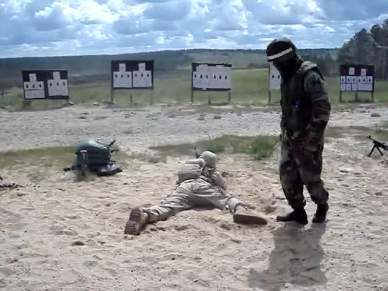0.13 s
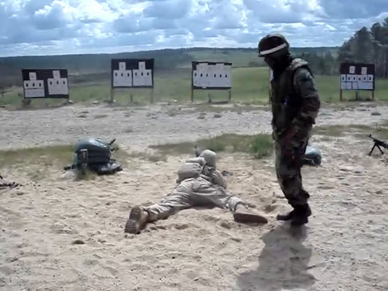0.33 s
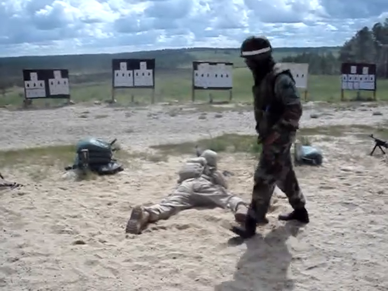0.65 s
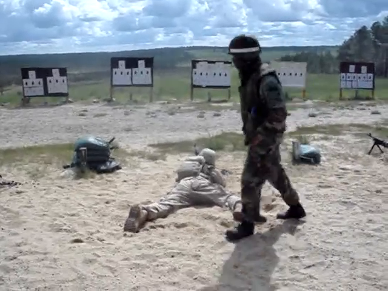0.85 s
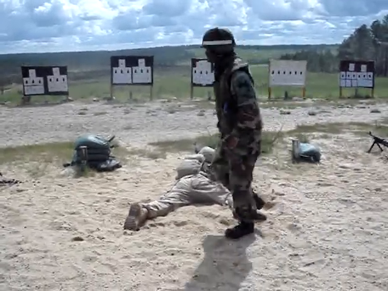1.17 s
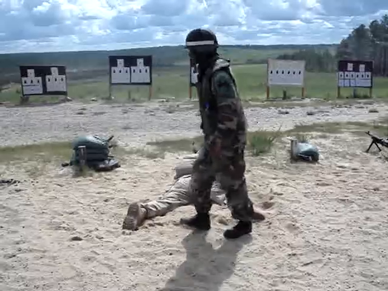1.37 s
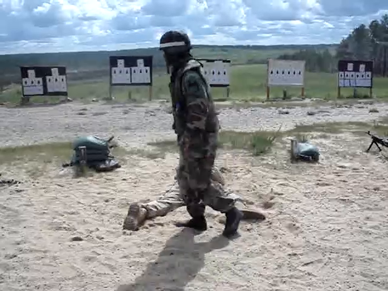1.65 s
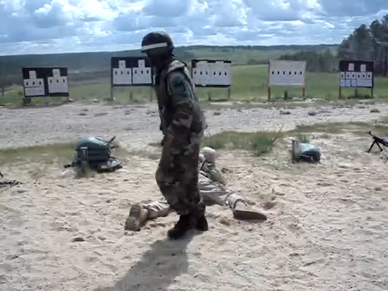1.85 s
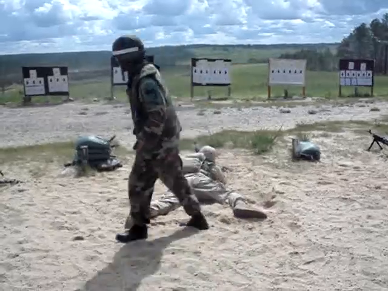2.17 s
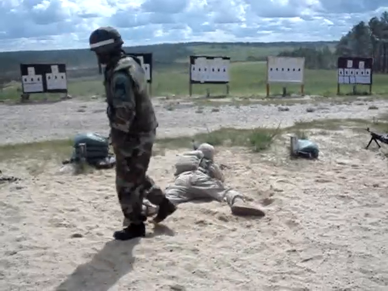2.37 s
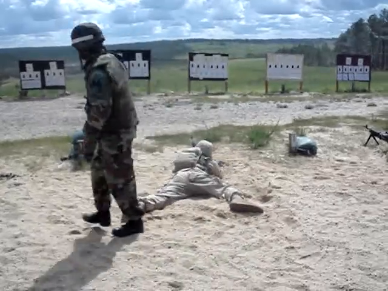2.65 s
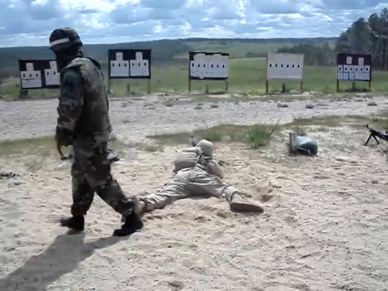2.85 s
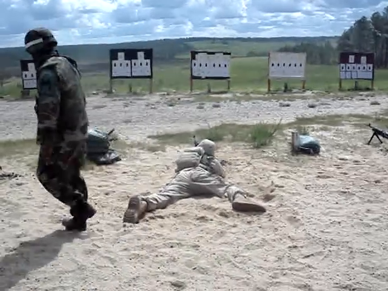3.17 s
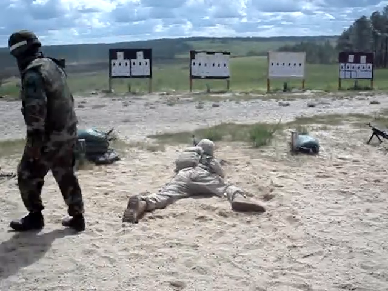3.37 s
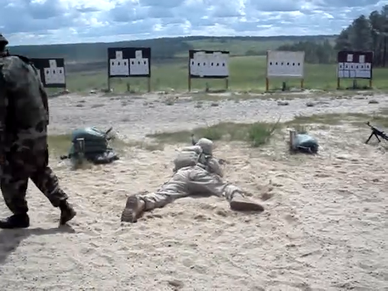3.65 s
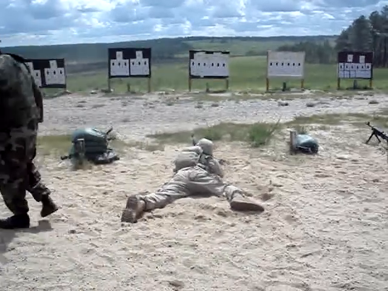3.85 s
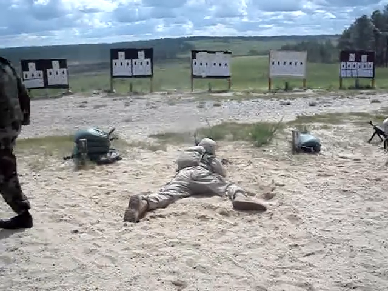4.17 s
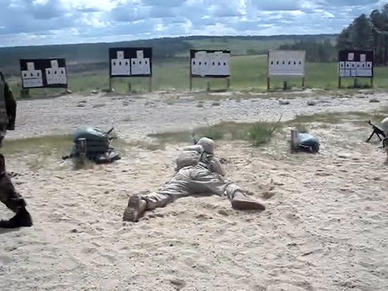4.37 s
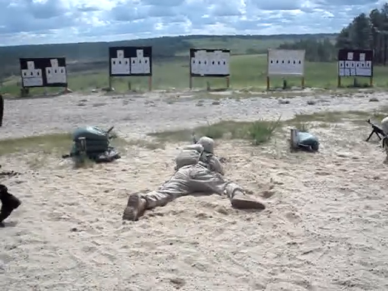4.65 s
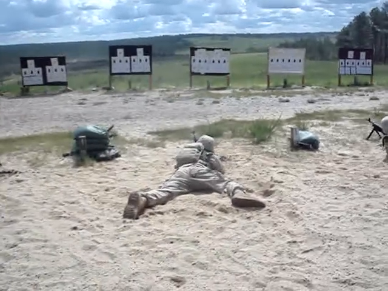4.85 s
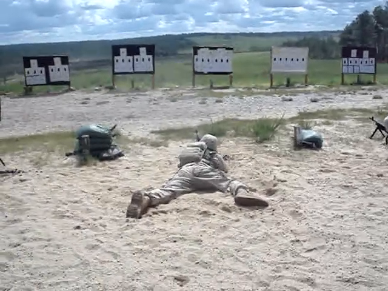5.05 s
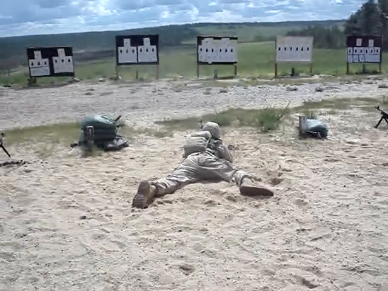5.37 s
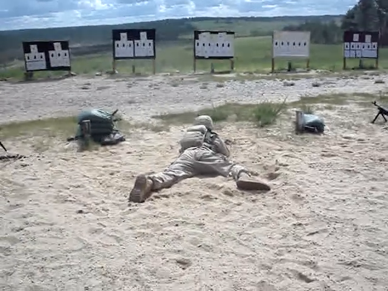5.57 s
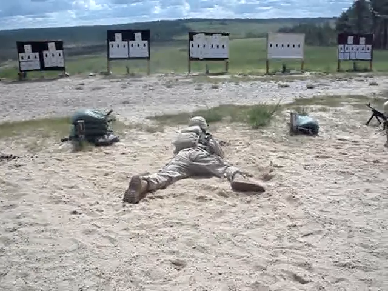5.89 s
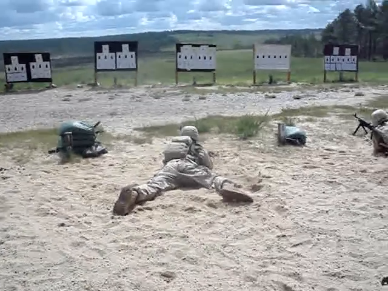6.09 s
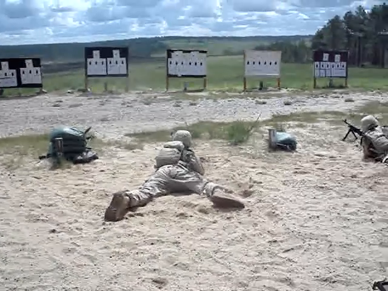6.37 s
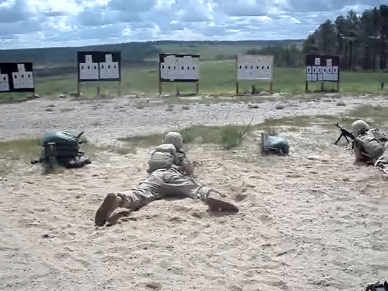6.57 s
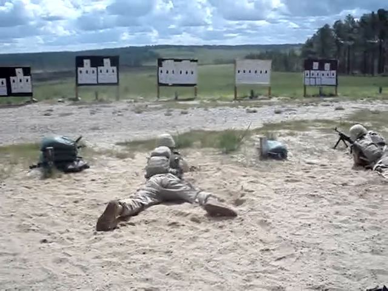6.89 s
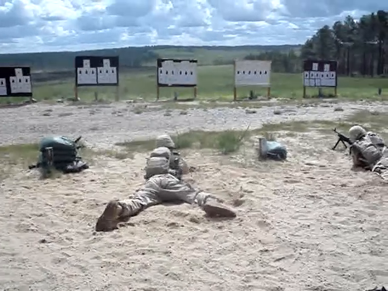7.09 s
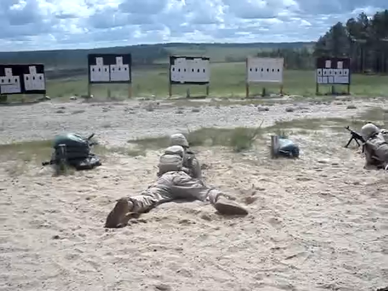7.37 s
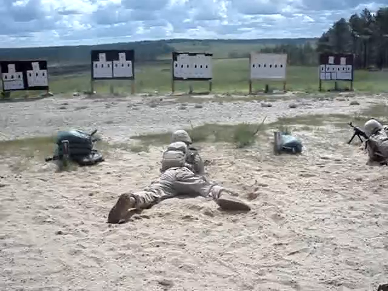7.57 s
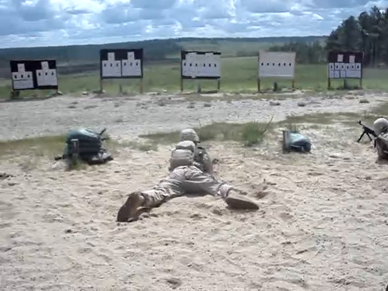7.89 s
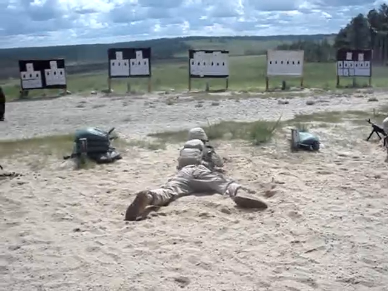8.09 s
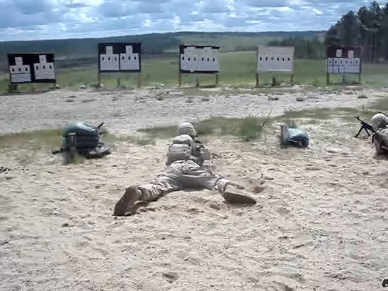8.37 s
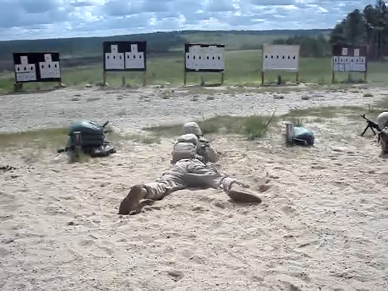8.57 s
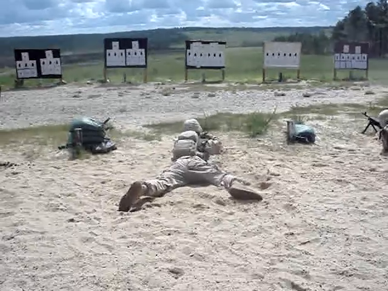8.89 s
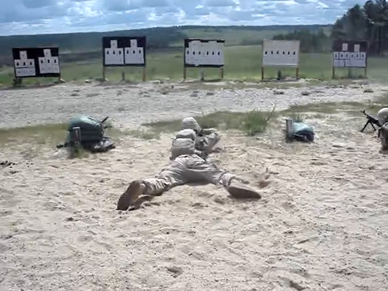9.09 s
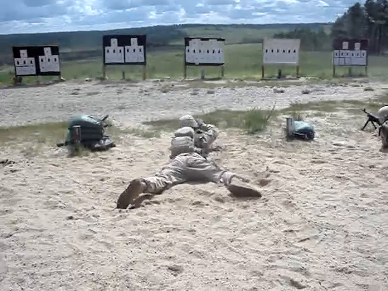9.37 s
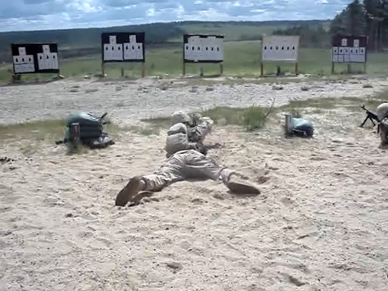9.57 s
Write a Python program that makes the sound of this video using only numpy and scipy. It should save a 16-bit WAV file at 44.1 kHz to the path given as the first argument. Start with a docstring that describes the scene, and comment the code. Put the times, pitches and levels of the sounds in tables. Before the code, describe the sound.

Several automatic weapons fire short rapid bursts outdoors, loud and overloaded, stopping twice for fading echoes and small steel clinks before resuming.

```python
"""Automatic weapons on an outdoor firing line, heard from just behind the gunners as a small camera picks them up.
Bursts overlap until 4.8 s, answered by woods already rolling at the start; after a pause, steel clinks and firing
resumes from 6.1 to 8.1 s. After a second pause and clink, one gun closes the scene from 9.2 s.
Each round is a pulse radiated as a muzzle blast, scattered by the ground and reflected by rows of target boards.
Overload flattens the blasts, and automatic gain lowers the level at each peak and raises it in the pauses."""
import sys
import numpy as np
from scipy import signal
from scipy.fft import rfft, irfft, next_fast_len
from scipy.io import wavfile
from scipy.ndimage import uniform_filter1d, map_coordinates

SR = 44100
rng = np.random.default_rng(int(sys.argv[2]) if len(sys.argv) > 2 else 0)


def unload_wav(signal):
    """Save mono or channel-first audio to the path in sys.argv[1] as 16-bit WAV at rate SR, clipped to [-1, 1]."""
    wavfile.write(
        sys.argv[1],
        SR,
        np.round(np.clip(np.atleast_2d(signal).T, -1, 1) * 32767).astype(np.int16),
    )


N = 429527


def amp(db):
    """Level to amplitude: 20 dB is a factor of ten."""
    return 10 ** (np.asarray(db) / 20)


def unit(x):
    """Normalization: scale x to an rms of 1."""
    return x / np.sqrt(np.mean(x ** 2) + 1e-20)


def along(points, hz):
    """Log-frequency interpolation: join (frequency [Hz], value) points at the frequencies hz."""
    f, v = np.transpose(points)
    return np.interp(np.log(hz + 1), np.log(f + 1), v)


def filtered(x, response):
    """Linear filtering: multiply the spectrum of x by a response of frequency."""
    m = next_fast_len(N + SR // 2)
    return irfft(rfft(x, m) * response(np.fft.rfftfreq(m, 1 / SR)), m)[:N]


def pulse(spectrum, size=8192):
    """Minimum phase: the causal pulse of this spectrum whose energy comes earliest, by folding the cepstrum."""
    level_db = along(spectrum, np.fft.rfftfreq(size, 1 / SR))
    cepstrum = irfft(np.log(amp(level_db)))
    cepstrum[1:size // 2] *= 2
    cepstrum[size // 2 + 1:] = 0
    return irfft(np.exp(rfft(cepstrum)))[:size // 4]


def add(out, s, x):
    """Superposition: mix x into out from time s."""
    i = max(round(s * SR), 0)
    out[i:i + len(x)] += x[:max(len(out) - i, 0)]


def wobble(rate):
    """Slow random modulation: a smooth curve through `rate` random knots a second."""
    knots = rng.standard_normal(int(N * rate / SR) + 4)
    return map_coordinates(knots, [np.arange(N) * rate / SR])


def breeze():
    """Wind noise: low-pass filtered noise whose faint level drifts, a rumble on the microphone."""
    rumble = filtered(rng.standard_normal(N), lambda hz: 1 / (1 + (hz / 45) ** 3))
    return amp(-86 + 2 * wobble(2)) * unit(rumble)


# gun metal being handled: (time [s], level before the high-pass [dB])
CLINKS = [(6.098, -48.5), (9.029, -42.5)]
# modes of the steel part: (frequency [Hz], relative level [dB], decay time T60 [s])
STEEL_MODES = [(3817, -4, 0.27), (6428, -18, 0.37), (7337, 0, 0.16), (7860, -31, 5.0)]


def clinks():
    """Modal ringing with friction noise: a steel part slides and its damped modes sound briefly."""
    out = np.zeros(N)
    t = np.arange(SR // 3) / SR
    for s, db in CLINKS:
        ring = sum(amp(level - 60 * t / t60) * np.sin(2 * np.pi * hz * t) for hz, level, t60 in STEEL_MODES)
        scrape = amp(1 - 60 * t / .18) * rng.standard_normal(len(t))
        add(out, s, amp(db) * (.55 * ring + scrape))
    return filtered(out, lambda hz: 1 - 1 / (1 + (hz / 3300) ** 4))


# bursts of each gun: (first round [s], last round [s], number of rounds, lag of the middle [s], # relative
# level of the first round [dB], of the last [dB]); "k" is no separate gun but the dense roar # that follows the
# first two rounds of each burst of gun f
BURSTS = { "a": [(.0165, .6526, 7, .0037, .4, -.3), (.4622, .4622, 1, 0, -2.5, -2.5)],
          "b": [(.5119, 1.055, 6, .0045, 0, 0), (4.2552, 4.7895, 6, -.0004, -3.6, 1),
          (7.5256, 8.0513, 6, .0013, -4.4, -.6)], "c": [(1.6038, 1.9991, 4, -.0012, .5, -1.5),
          (2.7045, 3.2282, 5, .0005, .2, -.8)], "d": [(1.403, 1.6274, 3, .0012, .6, -.6),
          (3.2277, 3.5694, 4, .0016, -1.3, .2)], "e": [(1.8761, 2.3222, 5, -.0007, 0, .4),
          (6.2201, 6.3296, 2, 0, 2.4, 1.4), (6.4458, 7.7789, 13, -.0021, 1, -.9)],
          "f": [(3.7867, 4.1912, 5, .0022, 1.5, -4.5), (6.1276, 6.7264, 7, .0002, .6, -3.6)],
          "g": [(9.1966, 9.3048, 2, 0, 0, 0), (9.418, 9.6297, 3, .0005, 0, -.2)],
          "h": [(2.0625, 2.2655, 3, -.002, 0, 0), (2.3624, 2.462, 2, 0, 0, 0),
          (3.999, 4.204, 3, .0005, -1, -2.4)], "i": [(3.899, 4.3067, 5, .0015, 1, -1),
          (6.117, 6.117, 1, 0, -11, -11)], "j": [(1.5975, 2.1158, 6, 0, 0, -2.8)],
          "k": [(3.794, 3.898, 2, 0, -7, -5), (6.135, 6.232, 2, 0, 1.5, -5)], }


def rounds_of(name):
    """Near-periodic excitation: (time [s], level [dB]) of each round, rate and strength drifting over a burst."""
    fired = []
    for first_s, last_s, count, lag_s, first_db, last_db in BURSTS[name]:
        u = np.linspace(0, 1, round(count))
        times = first_s + (last_s - first_s) * u + lag_s * (1 - (2 * u - 1) ** 2)
        fired += zip(times, first_db + (last_db - first_db) * u)
    return fired


def roll(t60, onset, earlier, uneven_db=3):
    """Reverberant build-up and decay: uneven clumps of trees return each round, and the energies add."""
    t = np.arange(N) / SR
    energy = np.zeros(N)
    for name in BURSTS:
        for s, _ in rounds_of(name):
            add(energy, s, np.ones(1))
    drain = amp(-60 * t / t60) ** 2
    clumps = amp(uneven_db * wobble(70)) ** 2
    clumps = clumps / uniform_filter1d(clumps, size=SR // 4)
    response = clumps * drain * (1 - np.exp(-t / onset))
    returned = signal.fftconvolve(energy, response)[:N]
    # `earlier` is the energy already rolling at the start, in rounds
    return np.sqrt(np.abs(returned + earlier * drain))


# colour of the tree line's rolling echo: (frequency [Hz], relative level [dB])
WOODS = [(20, -28), (45, -28), (110, -27), (170, -15), (300, -4), (600, -8), (780, -4), (1020, -.5),
         (1400, -4.5), (2450, -5), (3430, -15), (4500, -14.5), (7000, -23), (10000, -34)]


def woods(body_hz=750, split_hz=3200):
    """Diffuse reflection: a fluttering roar in three bands that roll on their own, the treble dying first."""
    noise = unit(filtered(rng.standard_normal(N), lambda hz: amp(along(WOODS, hz))))
    body = filtered(noise, lambda hz: 1 / (1 + (hz / body_hz) ** 4))
    dull = filtered(noise, lambda hz: 1 / (1 + (hz / split_hz) ** 4))
    low = amp(-45 + .7 * wobble(25)) * roll(t60=4.8, onset=.36, earlier=4) * body
    middle = amp(-44.1 + .7 * wobble(25)) * roll(t60=4, onset=.36, earlier=4) * (dull - body)
    high = amp(-42.2 + .8 * wobble(25)) * roll(t60=3, onset=.2, earlier=3) * (noise - dull)
    return (low + middle + high) * amp(.5 * wobble(9))


def scatter(count, t60, fresh=1, spiky=.45, size=8192):
    """Multiple scattering: dying swarms of tiny echoes of energy 1, a row per round, part shared and part new."""
    t = np.arange(size) / SR
    spikes = np.exp(spiky * rng.standard_normal((count + 1, size)))
    z = rng.standard_normal((count + 1, size)) * spikes
    shared, new = z[0], z[1:]  # the shared part is fixed by the terrain
    swarm = (shared + fresh * new) * amp(-60 * t / t60) * (1 - np.exp(-t / .0004))
    return swarm / np.linalg.norm(swarm, axis=1, keepdims=True)


def arrival(count, shape, front_db, scatter_db, t60):
    """Convolution: a direct pulse and its scatter train share one pulse shape, inverted; a row per round."""
    train = amp(scatter_db) * scatter(count, t60)
    train[:, 0] += amp(front_db)
    return signal.fftconvolve(train, -shape[None], axes=1)


# colour of the echoes from stones and stakes: (frequency [Hz], relative level [dB])
PATTER = [(100, -18), (300, -4), (1100, 0), (2500, -2), (4500, -7), (7000, -15), (10000, -26)]


def patter(count, t60=.25, spiky=1.1):
    """Sparse scattering: spiky small echoes from far stones and stakes, a row per round."""
    tick = pulse(PATTER)
    tick = tick / np.linalg.norm(tick)
    return signal.fftconvolve(scatter(count, t60, fresh=.7, spiky=spiky), tick[None], axes=1)


# wash off sand and scrub: (frequency [Hz], relative level [dB])
GROUND = [(40, -13), (120, -12), (260, 2), (480, 1), (750, -2), (1100, 0), (2500, -6), (5000, -16),
          (10000, -34)]


def ground_wash(count, blast, wash_db, t60):
    """Diffuse ground reflection: scatter in the ground's colour, its pulse given the energy of the blast pulse."""
    ground = pulse(GROUND)
    ground = ground * np.linalg.norm(blast) / np.linalg.norm(ground)
    return arrival(count, ground, front_db=-40, scatter_db=wash_db, t60=t60)


# colour of the bright small echoes: (frequency [Hz], relative level [dB])
SCRAP = [(100, -16), (500, -4), (1500, 0), (3500, -.5), (6000, -6.5), (8000, -10.5), (10000, -19)]
# echoes off frames and posts near each gun: (delay [s], nominal level [dB], decay time T60 [s])
SCRAPS = { "a": [(.0246, 1, .004)], "b": [(.008, -7.5, .04), (.031, -6, .05)], "c": [(.0165, -4, .012),
          (.028, 2, .022)], "d": [(.0243, 1.5, .028), (.052, -8, .01)], "e": [(.0115, -9, .012),
          (.0295, -1.5, .055)], "f": [(.032, -1, .04)], "g": [(.007, 1, .012), (.021, 3, .008),
          (.049, -4, .04)], "h": [(.036, -10, .012)], "i": [(.02, 0, .025)], "j": [(.024, -3, .015)],
          "k": [(.022, 3, .05)], }


def scraps(name, count, slap_delay):
    """Discrete and diffuse echoes: (delay, rows) of crackle off sand and gravel, then of frames and posts."""
    scrap = pulse(SCRAP)
    scrap = scrap / np.linalg.norm(scrap)
    # the crackle follows both the blast and the slap
    paths = [(delay, arrival(count, scrap, front_db=-40, scatter_db=crackle_db, t60=.055))
             for delay, crackle_db in [(0, -7.5), (slap_delay, -12)]]
    paths += [(delay, arrival(count, scrap, db - 13, db + .3, t60)) for delay, db, t60 in SCRAPS[name]]
    return paths


# what one target board throws back to each gun: (frequency [Hz], relative level [dB])
SLAP = { "a": [(120, -8), (350, 7), (700, 16), (1050, 11.5), (1900, 8.5), (4200, 5), (9500, -11)],
        "b": [(120, -9), (300, 16), (600, 14), (1000, 17), (1500, 13.5), (2000, -1), (2700, 2.5),
        (4200, -.5), (9500, -11)], "c": [(120, -6), (350, 18), (650, 21), (1030, 16), (1550, 15), (2100, 2),
        (2700, 5), (4200, 1), (9500, -10)], "d": [(120, 2), (350, 10), (750, 18), (1030, 17), (1650, 12.5),
        (2400, 3), (4200, 3), (9500, -11)], "e": [(120, -2), (350, 8), (700, 17), (870, 11), (1100, 16.5),
        (1350, 12), (1620, 16), (2400, 8.5), (3300, 8), (4200, -1), (9500, -13)], "f": [(120, 3), (350, 15),
        (700, 12), (1100, 16), (1550, 16), (2400, 8), (4200, 4), (9500, -8)], "g": [(120, 1), (350, 15),
        (720, 11), (1030, 17), (1650, 12), (2400, 8.5), (4200, 4), (9500, -8)], "h": [(120, -8), (400, 5),
        (1100, 11), (2000, 6), (3600, 15), (5500, 3), (9500, -8)], "i": [(120, 4), (350, 10), (700, 14),
        (1030, 16.5), (1500, 17), (2400, 4), (4200, -2), (9500, -13)], "j": [(120, 2), (350, 16), (720, 16),
        (1030, 13), (1650, 9), (2400, 3), (4200, 3), (9500, -9)], "k": [(120, 3), (350, 14), (1080, 17),
        (2400, 7), (9500, -8)], }
# boards behind the nearest, for each gun: (delay after the nearest [s], level before dulling [dB])
BOARDS = { "a": [(.001, -9), (.002, -7)], "b": [(.00105, -2), (.0019, -1.5), (.00298, -4.5)],
          "c": [(.001, -2), (.002, -5), (.003, -11)], "d": [(.0011, -1), (.002, -7), (.003, -12)],
          "e": [(.0011, -12), (.00186, -4.5), (.0028, -10)], "f": [(.001, -6), (.0019, -4)],
          "g": [(.001, -4), (.002, -8)], "h": [(.0011, -5)], "i": [(.0012, -12), (.002, -1.5),
          (.0028, -13)], "j": [(.001, -6)], "k": [(.001, -6), (.0019, -4)], }


def boards(name):
    """Comb interference: slaps of successive boards add, even steps giving a "tok", uneven a hollow tone pair."""
    one = pulse(SLAP[name])
    knock = one.copy()
    for delay, db in BOARDS[name]:
        add(knock, delay, amp(db) * uniform_filter1d(one, size=7))  # farther boards sound duller
    return knock


# muzzle blast of each gun as it reaches the listener: (frequency [Hz], relative level [dB])
BLAST = { "a": [(50, 3), (140, 7), (250, 20), (550, 14.5), (1000, 7), (1700, 13), (3400, 13), (5500, 3),
         (9500, -9)], "b": [(50.0, 4.5), (140.0, 5.5), (280.0, 13.8), (550.0, 11.3), (1000.0, 15.2),
         (1700.0, 15.7), (3200.0, 13.5), (5500.0, 5.6), (9500.0, -6.6)], "c": [(50, 10), (140, 6),
         (280, 18), (550, 23), (1000, 19), (1700, 16.5), (3200, 12.5), (5500, 6.5), (9500, -7)],
         "d": [(50, 10), (140, 5), (280, 16), (550, 21.5), (1000, 17), (1700, 16.5), (3200, 11.5),
         (5500, 5), (9500, -7)], "e": [(50.0, 11), (140.0, 6), (280.0, 15.5), (550.0, 5.0), (1000.0, 10.3),
         (1700.0, 10.3), (3200.0, 10.3), (5500.0, 4.6), (9500.0, -4.0)], "f": [(50.0, 9.3), (140.0, 7.6),
         (280.0, 14.6), (550.0, 16.1), (1000.0, 15.1), (1700.0, 16.0), (3200.0, 15.1), (5500.0, 7.3),
         (9500.0, -4.0)], "g": [(50, 13), (140, 9), (260, 22), (420, 23), (600, 18), (1000, 18.5),
         (1700, 18), (3200, 8), (5500, 6), (9500, -9)], "h": [(50, 2), (140, 12), (240, 21), (350, 17),
         (550, 8), (1000, 5), (1700, 2), (3200, -8), (9500, -22)], "i": [(50.0, 7), (140.0, 4.0),
         (280.0, 12), (550.0, 12.8), (1000.0, 14.0), (1700.0, 15.6), (3200.0, 13.7), (5500.0, 6.7),
         (9500.0, -1.8)], "j": [(50.0, 4.0), (140.0, 4.6), (280.0, 17.5), (550.0, 15.1), (1000.0, 14.8),
         (1700.0, 16.8), (3200.0, 13.3), (5500.0, 4.8), (9500.0, -7.7)], "k": [(50, 4), (140, 8), (300, 19),
         (1000, 17), (1700, 15), (3500, 12), (9500, -6)], }
# firing positions, and under "k" the dense roar after gun f's opening rounds: (shock front [dB], # its scatter
# [dB], scatter T60 [s], ground wash [dB], board slap delay [s], slap [dB], slap scatter [dB])
PLACE = { "a": (1.5, -3.5, .016, -14, .0302, .5, -5), "b": (.5, -4, .034, -9.5, .0436, -.5, -16),
         "c": (1, -6, .018, -12, .0354, -1, -14), "d": (1.5, -6, .02, -10, .0321, -1, -14),
         "e": (-5.5, -2, .02, -10, .0437, 0, -15), "f": (-1, -2.5, .045, -5.5, .048, -.5, -6),
         "g": (2.5, -6, .024, -5, .0255, -4, -1), "h": (-3, -11, .02, -12, .0229, -1, -9),
         "i": (-9, -3, .03, -9, .0536, 0, -13), "j": (0, -5.5, .024, -8, .038, -1, -5),
         "k": (-12, 3.5, .17, -7, .0398, -3, -7), }
# patter after each round of a gun, from further down the range: (relative level [dB])
PATTER_DB = {"a": -14, "b": -14, "c": -3, "d": -9, "e": -19, "f": -12, "g": -4.5, "h": -14, "i": -13, "j":
             -12, "k": -8}
VARY_DB = .8  # standard deviation of each path's level from round to round


def gun(name):
    """Multipath propagation: every round sends its blast along the same delayed paths to the listener."""
    front_db, scatter_db, scatter_t60, wash_db, slap_delay, slap_db, slap_scatter_db = PLACE[name]
    fired = rounds_of(name)
    count = len(fired)
    blast = pulse(BLAST[name])
    paths = [(0, arrival(count, blast, front_db, scatter_db, scatter_t60)),
             (.004, ground_wash(count, blast, wash_db, t60=.2)),
             (slap_delay, arrival(count, boards(name), slap_db, slap_scatter_db, t60=.02)),
             (slap_delay + .003, ground_wash(count, blast, wash_db - 1.5, t60=.17)),
             (slap_delay + .008, amp(PATTER_DB[name]) * patter(count))]
    paths += scraps(name, count, slap_delay)
    out = np.zeros(N)
    for delay, rounds in paths:
        for (s, db), sound, luck in zip(fired, rounds, rng.standard_normal(count)):
            add(out, s + delay, amp(db + VARY_DB * luck) * sound)
    return out


def scene():
    """Superposition of sources: breeze, handled steel, far echo and the firing line."""
    firing_line = sum(gun(name) for name in BURSTS)
    return (breeze() + clinks() + woods() + firing_line)[None]


def gain_control(x, threshold_db=-26, range_db=13.5, recovery=23, attack=.005):
    """Peak-hold compression: peaks lower the gain, which recovers at `recovery` dB/s; `attack` [s] smooths it."""
    creep = recovery * np.arange(N) / SR
    wanted = np.clip(20 * np.log10(np.abs(x) + 1e-9) - threshold_db, 0, range_db)
    wanted[0] = range_db  # already turned down by earlier fire
    held = np.maximum.accumulate(wanted + creep) - creep
    keep = np.exp(-1 / (attack * SR))
    gain_db = signal.lfilter([1 - keep], [1, -keep], range_db - held)
    return x * amp(gain_db)


# colour of the pickup: (frequency [Hz], relative level [dB])
MICROPHONE = [(30, 3), (70, 1.5), (120, .5), (280, .2), (600, .6), (850, -2), (1130, .7), (1600, .6),
              (2050, -1.5), (3600, 1), (7500, -.5), (10000, -5)]
TOP_HZ, OUTPUT_HZ = 10100, 16000  # band limits before and after the hard clip [Hz]
FULL_SCALE = .73  # amplitude where the sharpest peaks are cut flat


def record(dry, upper=.49, lower=.71):
    """Nonlinear transduction: pickup colour, gain control, lopsided overload, band limit, hard clip, band limit."""
    x = gain_control(signal.fftconvolve(dry[0], pulse(MICROPHONE))[:N])
    top = np.where(x > 0, upper, lower)
    overloaded = x / (1 + np.abs(x / top) ** 6) ** (1 / 6)
    limited = filtered(overloaded, lambda hz: np.clip((TOP_HZ - hz) / 200 + .5, 0, 1))
    cut = np.clip(limited, -FULL_SCALE, FULL_SCALE)
    return filtered(cut, lambda hz: hz < OUTPUT_HZ)[None]


dry = scene()
out = record(dry)
unload_wav(out)
```